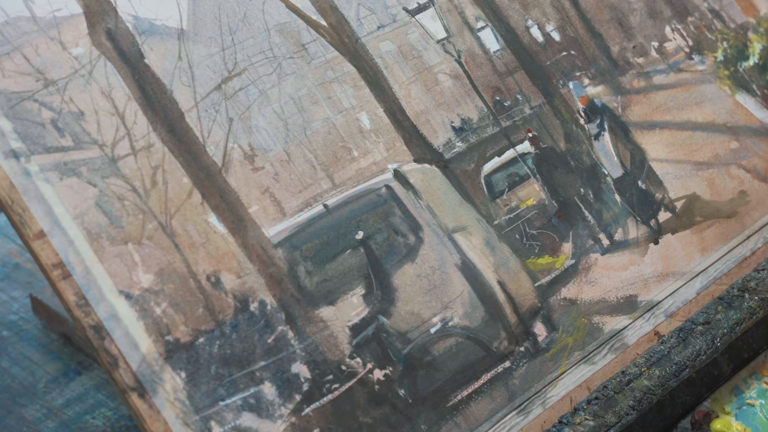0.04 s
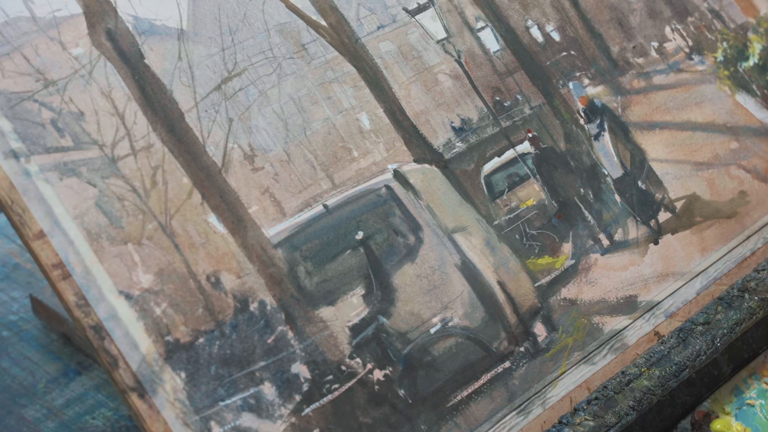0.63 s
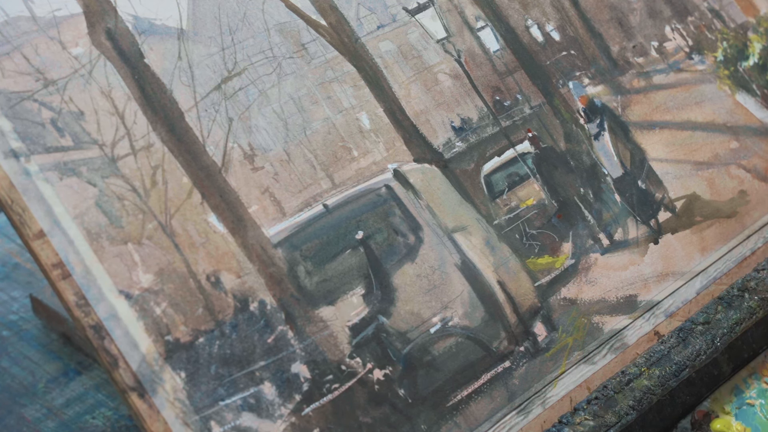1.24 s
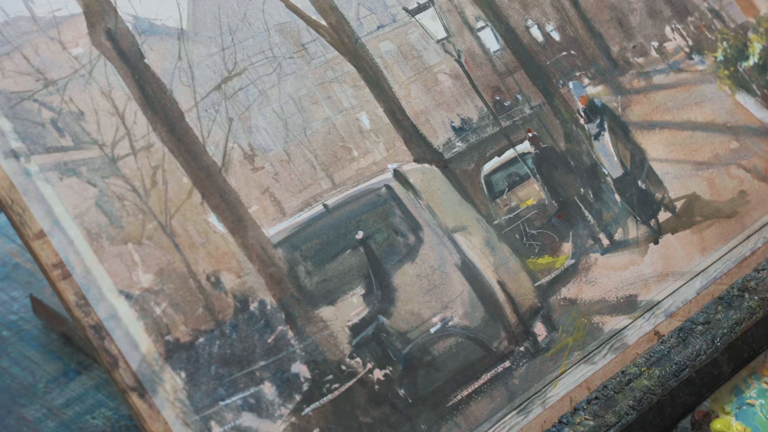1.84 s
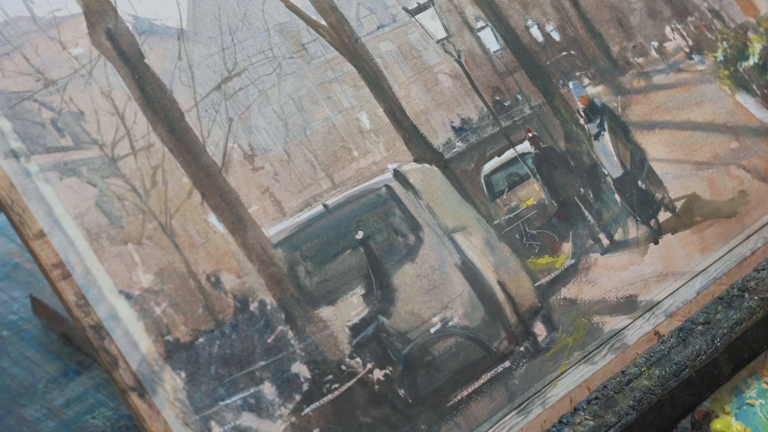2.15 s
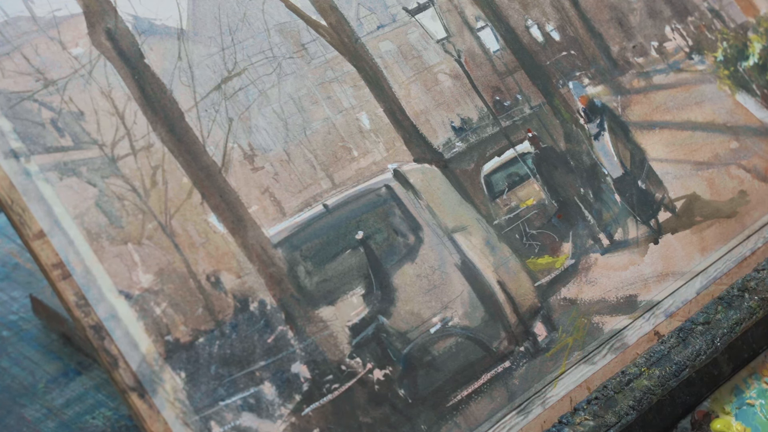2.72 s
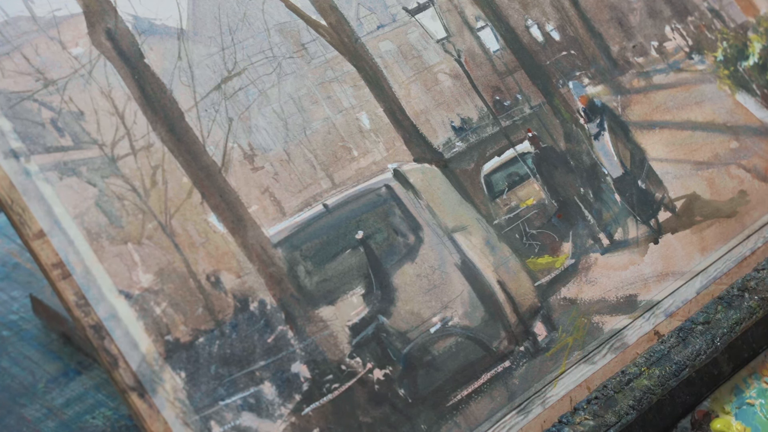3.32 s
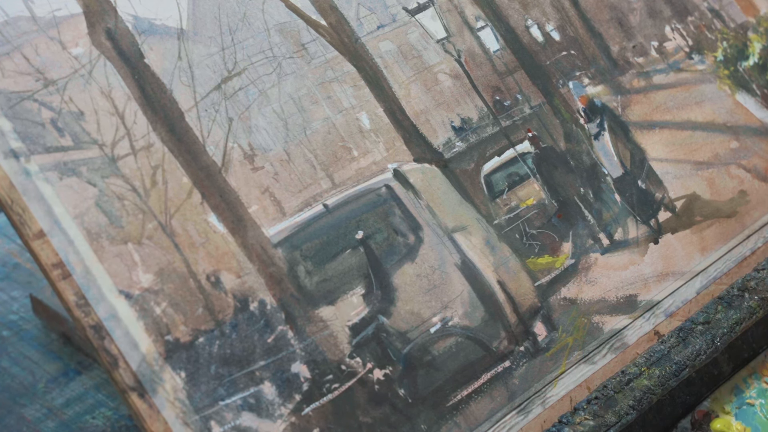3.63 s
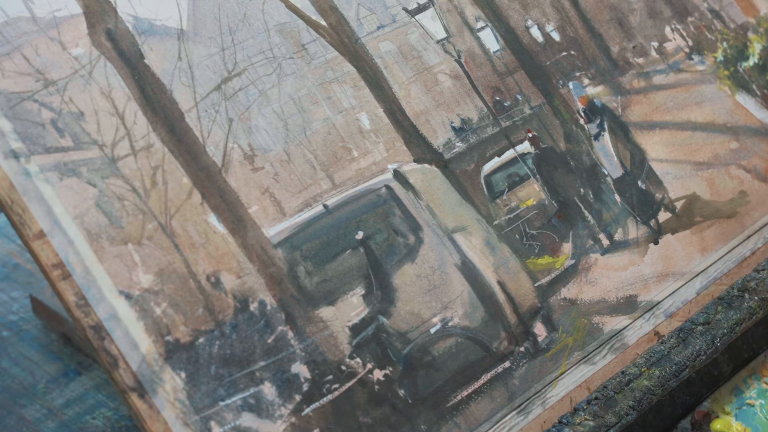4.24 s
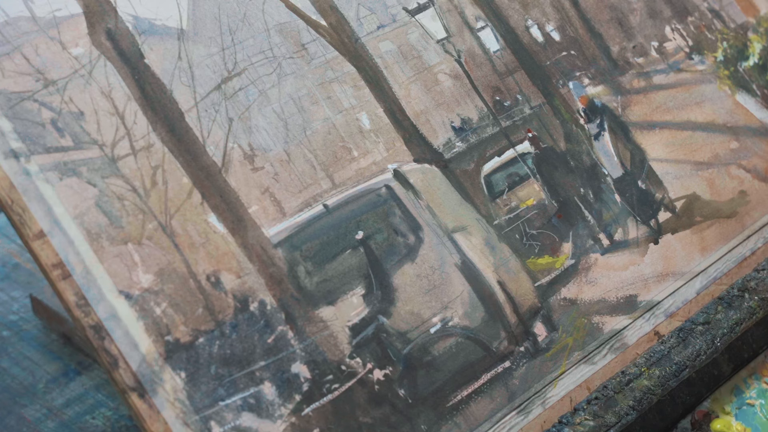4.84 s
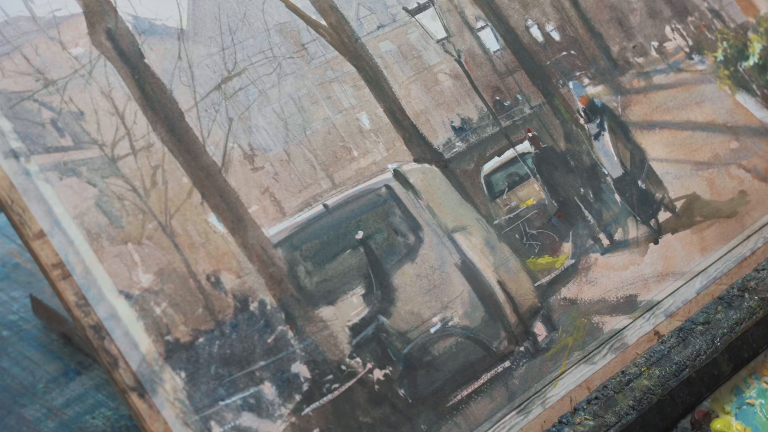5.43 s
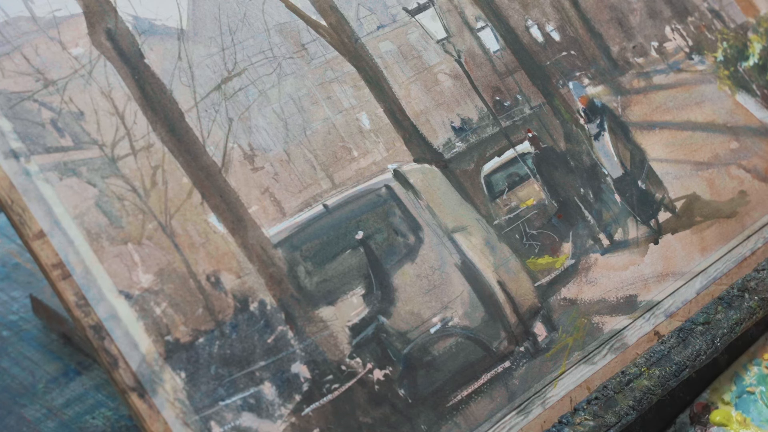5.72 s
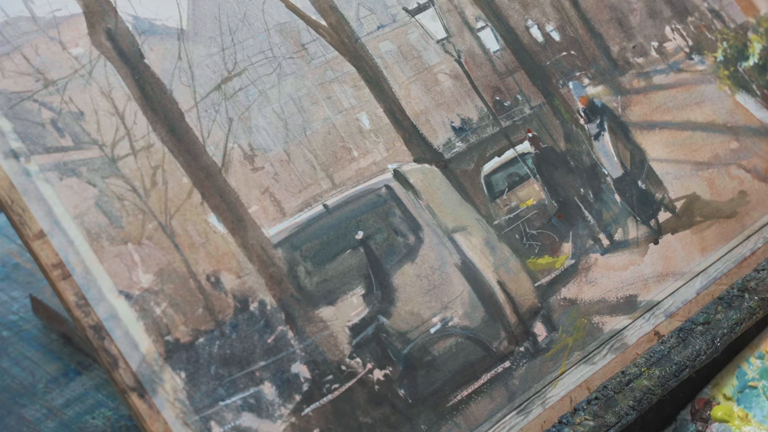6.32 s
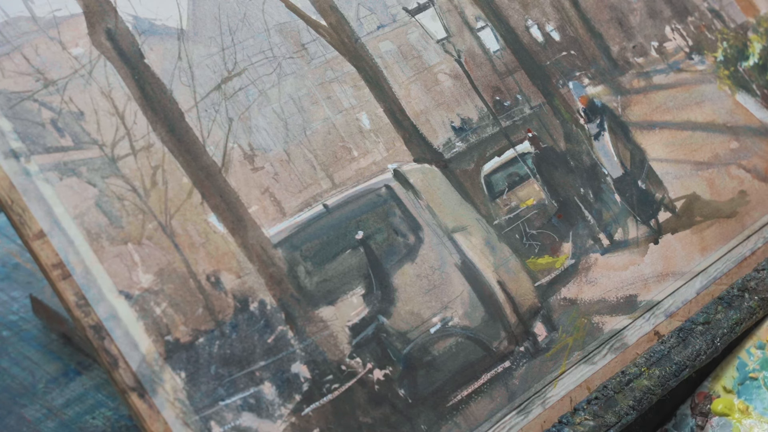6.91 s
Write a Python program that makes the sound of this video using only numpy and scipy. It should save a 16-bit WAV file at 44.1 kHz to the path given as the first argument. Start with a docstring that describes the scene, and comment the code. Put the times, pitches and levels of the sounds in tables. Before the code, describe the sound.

A dull knock on a desk and a few softer bumps come first, with faint brushing. A paintbrush is then stirred in a jar of water for about two seconds, gurgling, throwing droplets and clicking against the glass. Soft bristle rubbing follows as it is wiped, then two groups of hollow taps on a palette, the last tap loudest. The stereo microphone is close, in a small, quiet room.

```python
"""Rinsing a paintbrush

A painter rinses a brush in a water jar, wipes it, then taps it about a palette, close to a stereo
microphone. Each stroke in the water traps a cluster of ringing bubbles and throws droplets. Bristles
hiss and rub in runs of tiny slips; the palette and the desk ring with short modes when struck.
A small, quiet room answers everything."""
import sys
import numpy as np
from scipy import signal
from scipy.fft import rfft, irfft
from scipy.io import wavfile

SR = 44100
rng = np.random.default_rng(int(sys.argv[2]) if len(sys.argv) > 2 else 0)


def wav_out(sig):
    """Save sig, one row per channel (or a flat mono array), as 16-bit PCM at SR to the path in sys.argv[1]."""
    wavfile.write(sys.argv[1], SR, np.round(np.clip(np.atleast_2d(sig).T, -1, 1) * 32767).astype(np.int16))


N = 315756
TIME = np.arange(N) / SR
RING = TIME[:SR // 2]  # half a second, the time axis of one hit


def undb(db):
    """Decibels to gain."""
    return 10 ** (np.asarray(db) / 20)


def unit(x):
    """Scale to rms 1."""
    return x / np.sqrt(np.mean(x ** 2))


def burst(x):
    """Scale to the energy of 10 ms at rms 1."""
    return x / np.sqrt(np.sum(x ** 2) / (SR / 100))


def add(out, start_s, x):
    """Mix x into out at a given time."""
    i = int(np.clip(start_s * SR, 0, len(out) - 1))
    out[i:i + len(x)] += x[:len(out) - i]


def colour(x, points):
    """Minimum-phase EQ through (Hz, dB) points."""
    hz, db = np.transpose(points)
    size = 8192
    freqs = np.maximum(np.arange(size // 2 + 1) * SR / size, 1)
    gain = undb(np.interp(np.log(freqs), np.log(hz), db))
    cepstrum = irfft(np.log(gain))
    cepstrum[1:size // 2] *= 2
    cepstrum[size // 2 + 1:] = 0
    return signal.fftconvolve(x, irfft(np.exp(rfft(cepstrum))))[:len(x)]


def soften(x, hz):
    """Two-pole low-pass: a soft contact pushes for longer and sounds duller."""
    return signal.sosfilt(signal.butter(2, min(hz, SR / 3), fs=SR, output="sos"), x)


def gesture(start_s, length_s, rise_s, fall_s):
    """Envelope of one movement: a smooth rise, a hold, and a fade once its length is over."""
    rise = np.sin(np.pi / 2 * np.clip((TIME - start_s) / rise_s, 0, 1)) ** 2
    return rise * np.exp(-np.maximum(TIME - start_s - length_s, 0) / fall_s)


def crackle(per_second, spread_db):
    """Random impulses of unequal strength."""
    strength = undb(spread_db * np.minimum(rng.exponential(size=N), 4))
    return (rng.random(N) < per_second / SR) * rng.standard_normal(N) * strength


def crack(eq, decay_s):
    """The brief noise of a contact."""
    noise = rng.standard_normal(len(RING)) * np.exp(-RING / decay_s)
    return burst(colour(noise, eq))


def ring(modes, tuning, rise_s):
    """Decaying modes that build up as the blow spreads through the body."""
    tone = sum(undb(db) * np.sin(2 * np.pi * freq * tuning * RING) * np.exp(-np.log(1000) * RING / t60)
               for freq, db, t60 in modes)
    return -tone * (1 - np.exp(-RING / rise_s))


def diffuse(size, mic_gap_m=0.25):
    """Noise from all sides at two capsules: alike in the bass, unrelated in the treble."""
    likeness = np.sinc(2 * np.fft.rfftfreq(size, 1 / SR) * mic_gap_m / 343)
    mid = irfft(rfft(rng.standard_normal(size)) * np.sqrt((1 + likeness) / 2), size)
    side = irfft(rfft(rng.standard_normal(size)) * np.sqrt((1 - likeness) / 2), size)
    return np.array([mid + side, mid - side])


# The room's decay. Each row: frequency in Hz, T60 in seconds.
ROOM_DECAY = [(100, 0.83), (300, 0.35), (900, 0.28), (3000, 0.24), (14000, 0.22)]


def room_response():
    """Stereo reverb of a small room, the lows lasting longest."""
    hz, t60 = np.transpose(ROOM_DECAY)
    freqs, times, cells = signal.stft(diffuse(len(RING)), SR, nperseg=256)
    band_t60 = np.interp(np.log(freqs + 1), np.log(hz), t60)
    fade = np.exp(-np.log(1000) * times / band_t60[:, None])
    tail = signal.istft(cells * fade, SR)[1][:, :len(RING)]
    tail *= np.clip((RING - 0.002) / 0.00092, 0, 1)  # pre-delay
    tail *= 1 + np.exp(-RING / 0.0043)  # the desk top and near objects reflect first and strongest
    return tail / np.sqrt(np.sum(tail ** 2) / 2)


def place(x, lag_ms, pan_db, wet_db, treble_db):
    """Direct sound reaches the right capsule first and the room follows; positive pan leans left."""
    send = colour(x, [(700, wet_db), (5000, wet_db + treble_db)])
    reverb = np.array([signal.fftconvolve(send, side)[:N] for side in room_response()])
    left = np.pad(x, (int(lag_ms * SR / 1000), 0))[:N]
    return (np.array([left, x]) + reverb) * undb([[pan_db / 2], [-pan_db / 2]])


# EQ of the room's air. Each row: frequency in Hz, gain in dB.
AIR_EQ = [(12, -27), (20, -16), (49, 0.5), (172, -2), (204, -8.5), (234, -9.5), (310, -10.5), (472, -23.5),
          (513, -22), (923, -22), (1030, -26), (2320, -26), (2910, -28), (3250, -28), (16000, -32.5)]
# Swells of rumble. Each row: start in seconds, length in seconds, level in dB, centre in Hz.
RUMBLE_SWELLS = [(1.15, 0.77, -49.5, 18.8), (1.196, 0.59, -62, 90), (3.85, 1.13, -56, 46.5)]


def room_tone(air_db=-55.07, rumble_db=-62.5, swell_octaves=0.36):
    """A bed of steady air and a low rumble that swells now and then."""
    air = unit(np.array([colour(side, AIR_EQ) for side in diffuse(N)]))
    rumble_eq = [(12, -15), (20, 25.5), (33, -15), (48, -23.5), (70, 5), (200, -78)]
    rumble = undb(rumble_db) * unit(colour(rng.standard_normal(N), rumble_eq))
    for start_s, length_s, db, hz in RUMBLE_SWELLS:
        edges_hz = hz * 2 ** (np.array([-0.5, 0.5]) * swell_octaves)
        band = signal.butter(2, edges_hz, "bandpass", fs=SR, output="sos")
        swell = gesture(start_s, length_s, rise_s=0.17, fall_s=0.1)
        rumble += undb(db) * swell * unit(signal.sosfilt(band, rng.standard_normal(N)))
    return undb(air_db) * air + rumble


# The desk's body. Each row: frequency in Hz before tuning, level in dB, T60 in seconds.
DESK_MODES = [(185, -5.5, 0.14), (263, 3, 0.075), (333.7, 1.5, 0.098), (423, -12, 0.049), (543, -3, 0.057),
              (680, 0.5, 0.05)]
# EQ of a scuff on the desk. Each row: frequency in Hz, gain in dB.
SCUFF_EQ = [(150, -7), (450, 3), (1000, -1), (1500, 1), (2500, 0), (4500, -6), (9000, -8.5), (16000, 0.5)]
# Desk knocks. Each row: start in seconds, level in dB, contact cut-off in Hz, scuff trim in dB.
DESK_KNOCKS = [(.001, -12.5, 2760, 0), (.032, -40, 1500, 8), (0.085, -27, 910, 4), (.111, -31, 600, 5.5),
               (1.127, -34.5, 686, -5), (1.236, -30, 396, 7), (1.2479, -29.5, 734, 11),
               (1.514, -39.5, 720, 5.5), (1.77, -23, 400, 10), (5.171, -48, 1500, 6)]


def desk():
    """Things moved on the desk knock dully: a short scuff over the desk's low modes."""
    knocks = np.zeros(N)
    for start_s, db, contact_hz, scuff_db in DESK_KNOCKS:
        body = undb(-12) * ring(DESK_MODES, tuning=0.97, rise_s=0.0039)
        scuff = undb(scuff_db - 7.5) * crack(SCUFF_EQ, decay_s=0.0038)
        add(knocks, start_s, undb(db) * soften(body + scuff, contact_hz))
    return place(knocks, lag_ms=0.23, pan_db=1.8, wet_db=1, treble_db=4.5)


# The path of one faint squeak. Each row: time in seconds, pitch in Hz, level in dB.
SQUEAK_PATH = [(5.39, 3650, -80), (5.44, 3400, -65), (5.50, 3100, -72), (5.56, 3020, -78)]


def squeak():
    """Wet bristles stick and slip at an unsteady, falling rate."""
    times, hz, db = np.transpose(SQUEAK_PATH)
    jitter = 0.0155 * unit(soften(rng.standard_normal(N), 295))
    slip_hz = np.interp(TIME, times, hz) * (1 + jitter)
    level = undb(np.interp(TIME, times, db)) * (TIME >= times[0]) * (TIME <= times[-1])
    return level * np.sin(2 * np.pi * np.cumsum(slip_hz) / SR)


# EQs of the light hiss, the pressed rub and the ferrule's click. Each row: frequency in Hz, gain in dB.
HISS_EQ = [(1200, -38), (2500, -12.5), (4000, -6), (5500, -10.5), (7500, -12), (11000, -13), (16000, -23.5)]
RUB_EQ = [(210, -64), (350, -9.5), (490, 3.5), (714, -0.5), (1010, 3), (2040, -5), (3500, -3), (4550, -28),
          (7700, -120)]
FERRULE_EQ = [(800, -5.5), (2000, -5.5), (3600, 0.5), (5200, -6.5), (8000, -11.5), (12000, -14.5),
              (16000, -21)]
# Bristle strokes. Each row: start, length and attack in seconds, relative hiss and rub levels in dB.
BRUSH_STROKES = [(0.063, 0.2, 0.023, -63.5, -62), (0.29, 0.42, 0.045, -71, -64.5),
                 (1.116, 0.51, .03, -64, -61), (3.562, 0.73, .06, -58.5, -74),
                 (4.263, 0.19, .13, -55, -50.5), (4.438, .6, 0.036, -67, -90),
                 (5.159, 0.033, .015, -69, -60), (5.549, 0.14, .015, -64.5, -60),
                 (5.957, 0.14, 0.02, -60.5, -58), (6.354, 0.024, .015, -82, -60),
                 (6.462, 0.13, 0.017, -65, -63.5), (6.74, 0.047, 0.022, -62, -60)]
# The ferrule touching glass and palette. Each row: start in seconds, relative level in dB.
FERRULE_CLICKS = [(2.4402, -28), (2.83, -29.5), (3.5463, -44.5), (4.221, -53), (4.8761, -58),
                  (5.5562, -47.5), (5.6123, -48), (5.7069, -34.5), (6.0224, -44.5), (6.4701, -48),
                  (6.7996, -48), (6.8534, -39), (6.893, -45.5), (6.985, -48)]


def brush(lift_s=0.028):
    """Bristles flick over paper, cloth and paint in uneven runs of tiny slips; the ferrule clicks."""
    hiss_gain, rub_gain, clicks = np.zeros((3, N))
    for start_s, length_s, press_s, hiss_db, rub_db in BRUSH_STROKES:
        pressure = gesture(start_s, length_s, press_s, lift_s)
        hiss_gain += undb(hiss_db) * pressure
        rub_gain += undb(rub_db) * pressure
    grip = undb(3.2 * unit(soften(rng.standard_normal(N), 38)))
    hiss = unit(grip * colour(crackle(per_second=4700, spread_db=0.5), HISS_EQ))
    rub = unit(colour(crackle(per_second=3100, spread_db=3.5), RUB_EQ))
    bristles = undb(-3.5) * hiss_gain * hiss + undb(-6) * rub_gain * rub
    for start_s, db in FERRULE_CLICKS:
        add(clicks, start_s, undb(db - 7) * crack(FERRULE_EQ, decay_s=0.002))
    return place(bristles + clicks + squeak(), lag_ms=0.14, pan_db=-0.5, wet_db=0, treble_db=1.5)


# The palette's hollow knock. Each row: ratio to the tap's pitch, level in dB, T60 in seconds.
HOLLOW_MODES = [(.84, -36, 0.09), (1, 11.5, 0.031)]
# Ring-out of the palette and the water jar. Each row: frequency in Hz, level in dB, T60 in seconds.
PALETTE_MODES = [(147.2, -30, 0.35), (818, -27, 0.32), (950, -41, 0.22), (1170, -22, 0.21),
                 (1460, -23, 0.063), (1490, -30, .16), (1845, -27, 0.3), (2050, -42, 0.17),
                 (2820, -31, 0.21), (3820, -35, .13)]
JAR_MODES = [(715, 1, 0.56)]
# EQs of a tap's crack and of loose things rattling. Each row: frequency in Hz, gain in dB.
CRACK_EQ = [(150, -11), (450, 8), (1000, 2.5), (2500, -1), (4500, -12.5), (9000, -11), (16000, -2.5)]
RATTLE_EQ = [(60, -7), (130, -5.5), (250, 3.5), (420, -3), (600, -7.5), (900, -9), (2500, -44), (8000, -82)]
# Taps on the palette. Each row: start in seconds, level in dB, knock pitch in Hz,
# contact cut-off in Hz, then trims in dB for the ring-out, the desk thud and the crack.
PALETTE_TAPS = [(5.6952, -20, 932, 1300, -22, -16, -12.5), (5.909, -48, 900, 2000, 7, -29, -16),
                (5.936, -35.5, 990, 2400, -6, -19, 8), (5.9445, -22.5, 908, 1800, -5, -8, -13),
                (6.761, -53, 900, 3000, 11, -11, -7), (6.799, -49.5, 940, 4000, 17, -16, -2),
                (6.8547, -20, 910, 2180, 10.5, -2.5, -14), (6.893, -39.5, 940, 4000, -10, 7.5, 2),
                (6.984, -9.5, 901, 1660, 6, -10, -15)]


def palette():
    """Struck by the brush, the palette knocks and rings on; the desk thumps and loose things rattle."""
    blows, rings = np.zeros((2, N))
    for start_s, db, hz, contact_hz, ring_db, thud_db, crack_db in PALETTE_TAPS:
        hollow = ring(HOLLOW_MODES, tuning=hz, rise_s=0.0057)
        contact = undb(crack_db) * crack(CRACK_EQ, decay_s=0.0055)
        knock = soften(hollow + contact, contact_hz)
        thump = undb(-9.5) * soften(ring(DESK_MODES, tuning=0.8, rise_s=0.0015), 390)
        rattle = undb(-7) * crack(RATTLE_EQ, decay_s=0.04)
        add(blows, start_s, undb(db) * (knock + undb(thud_db) * (thump + rattle)))
        ring_out = undb(ring_db) * soften(ring(PALETTE_MODES, tuning=1, rise_s=0.0077), contact_hz)
        # shaken through the desk, the jar speaks up only on hard taps
        jar = undb(-7 + 1.9 * db) * ring(JAR_MODES, tuning=1, rise_s=0.004)
        add(rings, start_s, undb(db) * (ring_out + jar))
    return (place(blows, lag_ms=0.14, pan_db=1, wet_db=-7.5, treble_db=12.5)
            + place(rings, lag_ms=0.14, pan_db=1, wet_db=-16.5, treble_db=-3))


RINSE_START_S, RINSE_LENGTH_S, SETTLE_S = 1.61, 1.87, 0.055
LOWEST_BUBBLE_HZ = 294.3
LEAD_IN_S = 0.015  # a cluster gathers for this long before its main bubble


def bubble(hz, cycles, glide):
    """A pocket of air swings up, rings for some cycles and rises in pitch as it nears the surface."""
    life_s = cycles / hz
    t = TIME[:int(life_s * SR) + 2]
    attack = 1 - np.exp(-(t * hz / 1.38) ** 2)
    phase = 2 * np.pi * hz * t * (1 + glide * t / life_s / 2)
    return attack * np.sin(phase) * np.exp(-np.log(1000) * t / life_s)


def cluster(hz, octaves, scatter_s, cycles, main_db, count):
    """One main bubble among others of scattered size; a few come just ahead of it."""
    out = np.zeros(len(RING))
    add(out, LEAD_IN_S, undb(main_db) * bubble(hz, cycles, glide=0.077))
    waits = rng.exponential(size=count) - 0.33 * rng.exponential(size=count)
    for wait, detune, strength in zip(waits, rng.standard_normal(count), rng.uniform(-1.13, 1, count)):
        pitch = np.clip(hz * 2 ** (octaves * detune), LOWEST_BUBBLE_HZ, SR / 3)
        # large bubbles ring longer, so they start weaker
        gain = strength * np.sqrt(pitch / hz) * np.exp(-max(wait / 2, -2 * wait))
        add(out, LEAD_IN_S + wait * scatter_s, gain * bubble(pitch, cycles * 0.71, glide=0.66))
    return burst(out)


def bubbling(low_hz, high_hz, eq, cycles, spread_db, count):
    """Stirring frees bubbles of all sizes at random moments; rms is about 1 during the rinse."""
    out = np.zeros(N)
    for when, height, chance in rng.random((count, 3)):
        gain = undb(-spread_db * np.log(max(chance, 0.03)))
        start_s = RINSE_START_S + when * (RINSE_LENGTH_S + 2 * SETTLE_S)
        hz = low_hz * (high_hz / low_hz) ** height
        add(out, start_s, gain * bubble(hz, cycles, glide=0.054))
    return np.sqrt(RINSE_LENGTH_S / TIME[-1]) * unit(colour(out, eq))


def churn(sloshes, wake_s=0.036):
    """Gains of gurgle and spray: stirring keeps both going, and each stroke leaves a dying wake."""
    pushes = np.zeros(N)
    for start_s, db, *_ in sloshes:
        add(pushes, start_s, [undb(db) ** 2])
    wake = np.sqrt(signal.lfilter([1], [1, -np.exp(-2 / (wake_s * SR))], pushes))
    stirring = gesture(RINSE_START_S, RINSE_LENGTH_S, rise_s=0.056, fall_s=SETTLE_S)
    froth_build = gesture(RINSE_START_S, RINSE_LENGTH_S, rise_s=1.0, fall_s=SETTLE_S)
    gurgle_gain = np.hypot(undb(-40) * stirring, undb(-6) * wake)
    spray_gain = np.hypot(undb(-45.5) * froth_build, undb(-27.5) * wake)
    return gurgle_gain, spray_gain


# EQs of the gurgle, the fine spray and a droplet's snap. Each row: frequency in Hz, gain in dB.
GURGLE_EQ = [(150, -28), (300, -6.5), (1100, 9.5), (2000, -0.5), (3000, -6), (5000, -21)]
SPRAY_EQ = [(1200, -18), (2500, 4.5), (4000, -1), (7000, -1.5), (12000, -7.5), (16000, -7.5)]
SNAP_EQ = [(1000, -23), (3000, -6), (5000, 4.5), (8000, 4.5), (12000, 0), (16000, -6.5)]
# Droplets hitting the surface and the glass.
# Each row: start in seconds, relative level in dB, pitch in Hz, snap trim in dB.
DROPLETS = [(1.694, -37.5, 2470, -8.5), (1.7417, -40.5, 4600, -26), (1.778, -43.5, 2640, 8.5),
            (1.8614, -48.5, 2480, 7.5), (1.943, -43, 6700, -1), (2.0166, -34, 2600, -15),
            (2.132, -43.5, 3860, -25), (2.2339, -28.5, 2700, -16.5), (2.2862, -38, 2780, -8),
            (2.3211, -28.5, 3800, -38), (2.356, -40, 10300, -23), (2.402, -33.5, 2450, -0.5),
            (2.4406, -29, 4200, -15), (2.4845, -26.5, 2520, -16), (2.828, -34.5, 4200, -32),
            (2.9469, -42, 2900, -10), (3.044, -32.5, 2360, -6), (3.123, -39.5, 3820, -4),
            (3.1988, -27.5, 3440, -16), (3.228, -42, 8700, -1), (3.3746, -31.5, 2770, -2.5),
            (3.4292, -35, 3300, 6)]
# Brush strokes in the water. Each row: start in seconds, relative level in dB, bubble pitch in Hz,
# fizz trim in dB, the main bubble's level within its cluster in dB.
WATER_STROKES = [(1.621, -38.5, 410, -13, 6), (1.641, -36.5, 455, -38, 3), (1.666, -32, 744, -18, 4.5),
                 (1.768, -25.5, 1075, -14, -8), (1.784, -32.5, 556, -6, 19), (1.858, -34, 1500, -10.5, 14),
                 (1.927, -26.5, 1396, -37, 14), (2.014, -41.5, 1490, 2.5, 13), (2.1, -27, 1164, -17, 8.5),
                 (2.179, -40, 840, -1.5, 10), (2.243, -30, 1480, -5, 3.5), (2.301, -29, 740, -13, -1),
                 (2.411, -25.5, 1042, -12, 3), (2.428, -29.5, 317, -28, -1), (2.567, -31, 840, 1, -5),
                 (2.59, -32.5, 1276, -27, 15), (2.731, -23, 794, -17, -6), (2.806, -23.5, 1062, -14, 13.5),
                 (2.895, -34.5, 1014, -7, 12), (2.907, -32, 446, -28, 0), (2.942, -31.5, 386, -10.5, 7),
                 (2.969, -35.5, 430, -16, -2), (3.043, -24, 1022, -25, 6), (3.108, -31, 777, -17, -11),
                 (3.144, -30.5, 1230, -34, 26), (3.22, -30.5, 808, -13, -3), (3.284, -31, 1080, -10, 3),
                 (3.352, -40, 1070, 6.5, 17), (3.373, -35.5, 1010, -6, 8), (3.43, -30, 1030, -13, 0),
                 (3.447, -24.5, 1174, -16, 9)]


def water():
    """Strokes gulp air and fizz, droplets snap, and small bubbles and froth fill the gaps."""
    lows, highs = np.zeros((2, N))
    for start_s, db, hz, fizz_db, main_db in WATER_STROKES:
        gulp = cluster(hz, octaves=0.542, scatter_s=0.0088, cycles=22.6, main_db=main_db, count=32)
        fizz = cluster(2840, octaves=0.69, scatter_s=0.015, cycles=23, main_db=-61, count=30)
        add(lows, start_s - LEAD_IN_S, undb(db - 4.5) * gulp)
        add(highs, start_s - LEAD_IN_S, undb(db + fizz_db - 5.5) * fizz)
    for start_s, db, hz, snap_db in DROPLETS:
        plink = cluster(hz, octaves=0.37, scatter_s=0.004, cycles=23, main_db=6, count=12)
        add(highs, start_s - LEAD_IN_S, undb(db - 7.5) * plink)
        add(highs, start_s, undb(db + snap_db - 9.5) * crack(SNAP_EQ, decay_s=0.0054))
    gurgle_gain, spray_gain = churn(WATER_STROKES)
    gurgle = bubbling(LOWEST_BUBBLE_HZ, 3350, GURGLE_EQ, cycles=11.1, spread_db=1.5, count=1400)
    spray = bubbling(2156, 15600, SPRAY_EQ, cycles=45, spread_db=3.5, count=1300)
    # bristles dragging through the surface burst a fine froth
    froth = unit(colour(crackle(per_second=560, spread_db=7), SPRAY_EQ))
    lows += gurgle_gain * undb(-10.5) * gurgle
    highs += spray_gain * (undb(-8.5) * spray + undb(-14.5) * froth)
    return (place(lows, lag_ms=0.23, pan_db=1, wet_db=-1, treble_db=8)
            + place(highs, lag_ms=0.27, pan_db=-1.5, wet_db=-1.5, treble_db=4))


def scene():
    """Everything on the painter's desk, over the room tone."""
    return water() + palette() + desk() + brush() + room_tone()


def record(dry):
    """A steep low-pass takes off the very top."""
    top_hz = 15900
    return signal.sosfilt(signal.ellip(10, 0.2, 70, top_hz, fs=SR, output="sos"), dry)


dry = scene()
out = record(dry)
wav_out(out)
```